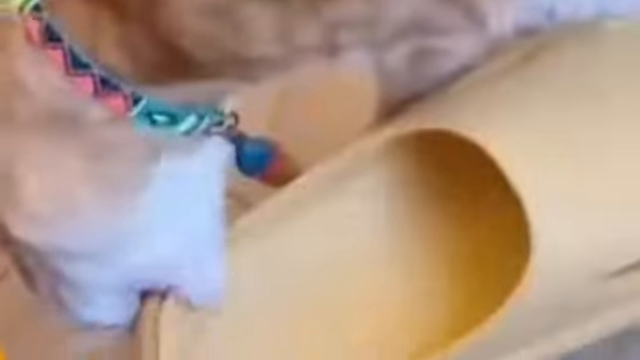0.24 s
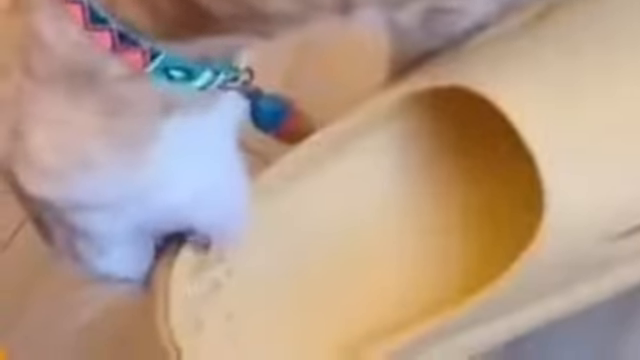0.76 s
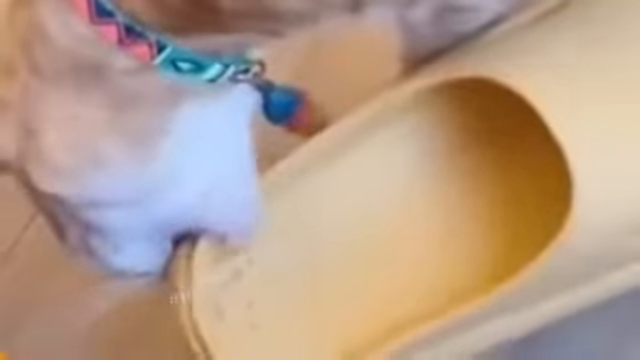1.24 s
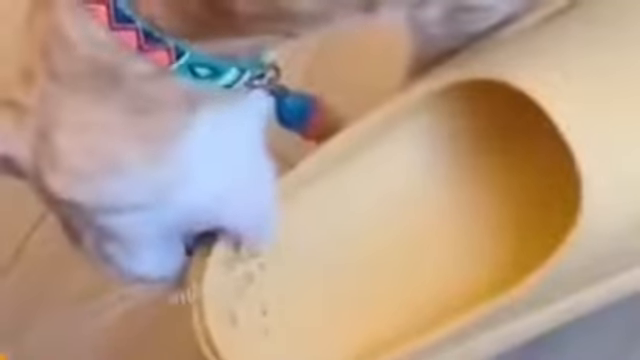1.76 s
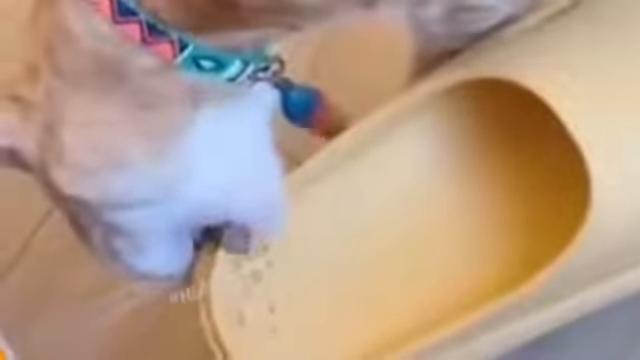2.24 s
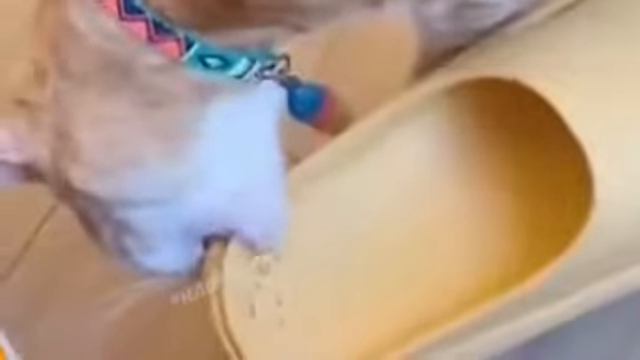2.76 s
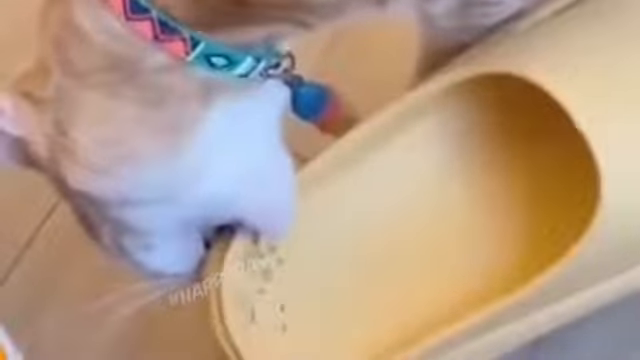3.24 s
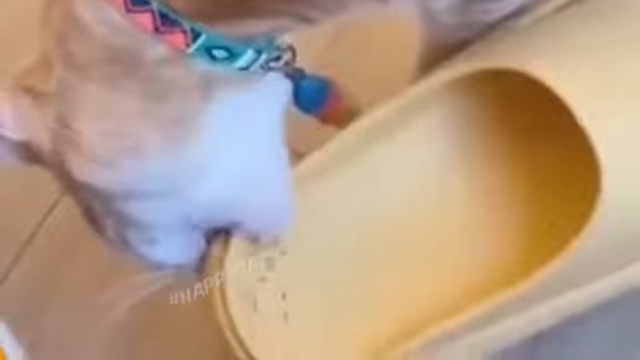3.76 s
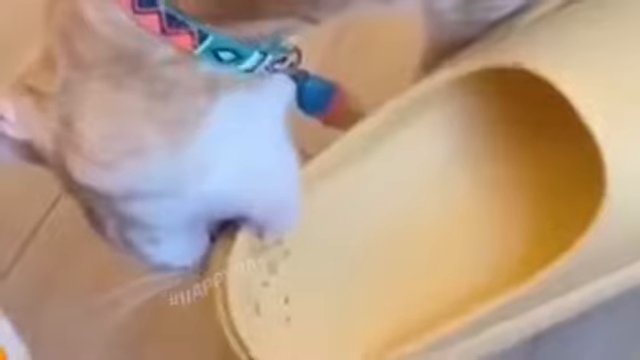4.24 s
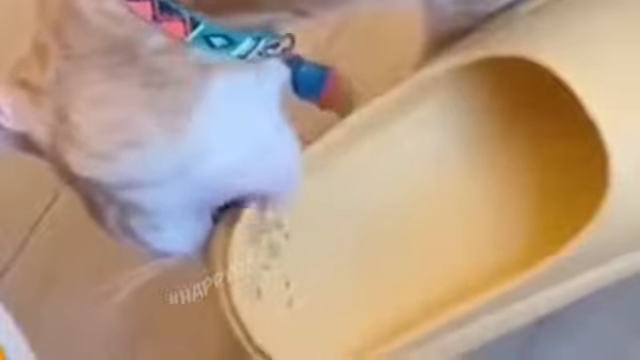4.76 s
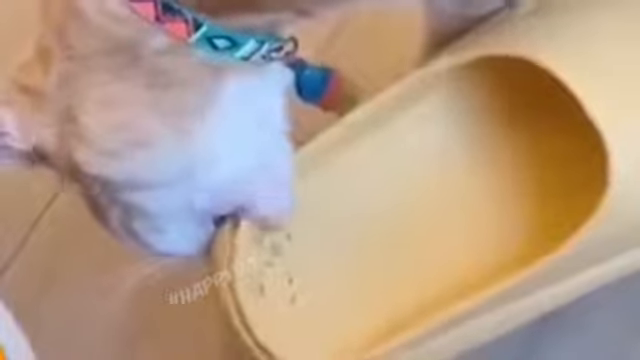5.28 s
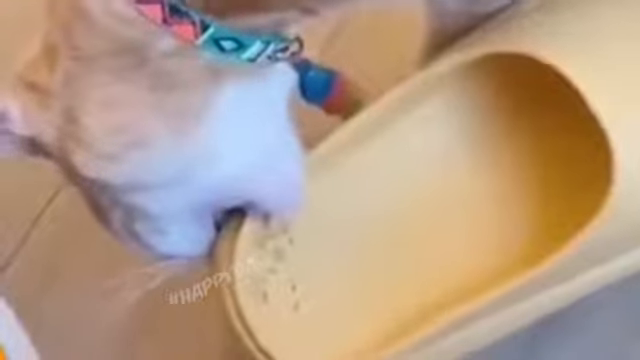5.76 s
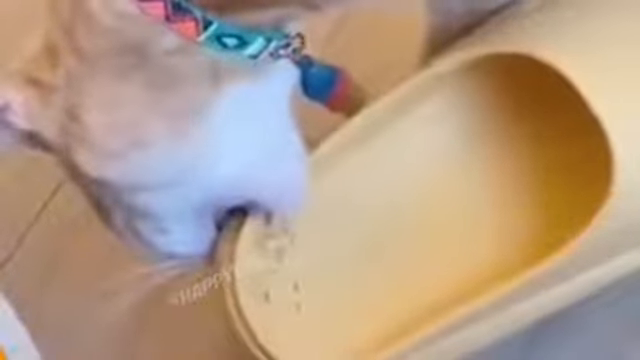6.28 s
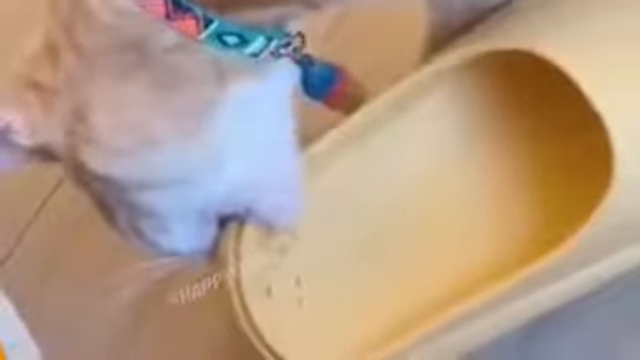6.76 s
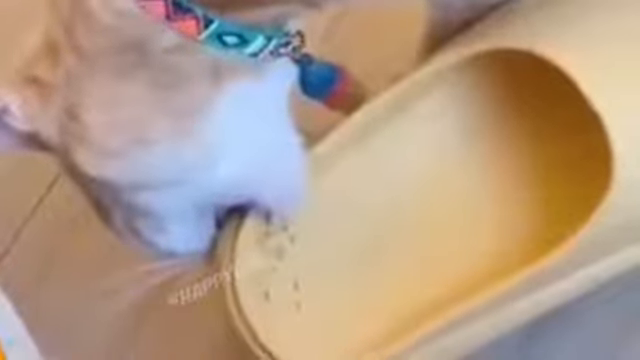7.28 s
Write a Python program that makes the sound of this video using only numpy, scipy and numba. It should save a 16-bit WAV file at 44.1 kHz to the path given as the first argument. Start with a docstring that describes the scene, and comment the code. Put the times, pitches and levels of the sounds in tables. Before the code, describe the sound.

Extremely close to the microphone, a cat eats dry food from a bowl. Every 1.3 seconds or so it draws hissing air through its nose, smacks and cracks a bit, then puffs out a snort whose tail flutters unevenly. A tiny collar bell tinkles faintly with some movements. Quiet indoor room with a low, swelling rumble and a few faint distant chirps.

```python
"""Cat chewing at the microphone

Right by the phone, a cat chews and snuffles: shaped noise hisses in through the nose, then puffs out in snorts
whose tails flutter with uneven beats. Bits crack and smack as noise pushes ring the mouth; teeth squeak in
falling tones. A tiny collar bell rings faintly in decaying sines, breathy chirps come from far off, and
bands of background noise lie under it all with a low, swelling room rumble.
"""
import sys
import numpy as np
from scipy import signal
from scipy.io import wavfile
from scipy.ndimage import uniform_filter1d
from numba import njit

SR = 44100
rng = np.random.default_rng(int(sys.argv[2]) if len(sys.argv) > 2 else 0)


def wav_out(sig):
    """Save sig, one row per channel (or a flat mono array), as 16-bit PCM at SR to the path in sys.argv[1]."""
    wavfile.write(sys.argv[1], SR, np.round(np.clip(np.atleast_2d(sig).T, -1, 1) * 32767).astype(np.int16))


N = 331191  # samples, about 7.5 s


def undb(db):
    """Gain of a level."""
    return 10 ** (np.asarray(db) / 20)


def unit(x):
    """Scale to rms 1."""
    return x / np.sqrt(np.mean(x ** 2))


@njit
def svf(x, hz, width):
    """State-variable band-pass whose centre and width may move, gain 1 at the centre."""
    y, band, low = np.empty(len(x)), 0., 0.
    for i in range(len(x)):
        g = np.tan(np.pi * hz[i] / SR)
        damping = width[i] / hz[i]
        v = (band + g * (x[i] - low)) / (1 + g * (g + damping))
        band = 2 * v - band
        low += 2 * g * v
        y[i] = damping * v
    return y


def ring(x, hz, width):
    """A steep resonance: the band-pass twice, each pass wider so that the pair has about the given width."""
    hz = np.zeros(len(x)) + hz
    width = np.zeros(len(x)) + 1.5 * width
    return svf(svf(x, hz, width), hz, width)


def body(x, modes):
    """Sum of resonances, neighbours in opposite phase."""
    return sum((-1) ** k * undb(db) * ring(x, hz, w) for k, (hz, w, db) in enumerate(modes))


def walk(rate):
    """Random levels held 1 / rate s and slewed twice."""
    k = int(SR / rate)
    steps = np.repeat(rng.standard_normal(N // k + 1), k)
    return uniform_filter1d(uniform_filter1d(steps, k), k)[:N]


def patchy(x, modes):
    """Sum of resonances that each brighten and dim alone as the mouth moves."""
    out = 0
    for k, (hz, width, db) in enumerate(modes):
        gain = undb(db + 3.2 * walk(50))  # 50 new levels per s
        out = out + (-1) ** k * gain * ring(x, hz, width)
    return out


def dull(x, cheek_hz=7700):
    """Flesh takes the top off what sounds inside the head: a low-pass."""
    return signal.sosfilt(signal.butter(4, cheek_hz, fs=SR, output="sos"), x)


SHUT_DB = -110


def swell(u, attack, curve=1.3):
    """Level in dB of a start: shut before 0, rising to 0 dB over the attack."""
    return np.maximum(20 * curve * np.log10(np.clip(u / attack, 1e-9, 1)), SHUT_DB)


# Spectrum of the room's background, before its overall level: pitch_hz, relative_db_per_hz
ROOM_SPECTRUM = [(12, -31), (20, -23.5), (119, -3), (386, -13.5), (954, -31), (1330, -23.5), (1560, -31.5),
                 (2110, -23), (2290, -31.5), (3760, -25.5), (4680, -32.5), (7660, -31.5), (8790, -31),
                 (9800, -58), (14000, -56)]
# Level of the low rumble over time: time_s, level_db
RUMBLE_LEVELS = [(0.0, -63), (0.29, -57.5), (1.09, -67), (1.13, -52.5), (2.32, -74), (2.46, -51.5),
                 (2.59, -57.5), (3.3, -64), (3.97, -56), (4.45, -66), (5.56, -46.5), (5.66, -59),
                 (5.8, -51), (5.91, -76), (6.08, -54), (6.23, -72.5), (6.43, -59.5), (7.5, -66)]


def room(room_db=-64, rumble_hz=70.5, rumble_width_hz=46, rumble_swell_db=1.5):
    """Third-octave bands of background noise that flicker alone, and a band of low noise that swells."""
    hiss = 0
    spectrum_hz, spectrum_db = np.transpose(ROOM_SPECTRUM)
    for hz in 25 * 2 ** (np.arange(27) / 3):
        db = np.interp(np.log(hz), np.log(spectrum_hz), spectrum_db) + 0.5 * walk(1.4)
        hiss = hiss + undb(db) * ring(rng.standard_normal(N), hz, hz / 4)
    time_s, level_db = np.transpose(RUMBLE_LEVELS)
    rumble = ring(rng.standard_normal(N), rumble_hz, rumble_width_hz)
    rumble = unit(undb(rumble_swell_db * walk(7)) * rumble)
    rumble_db = np.interp(np.arange(N) / SR, time_s, level_db)
    return undb(room_db) * unit(hiss) + undb(rumble_db) * rumble


# Modes of the tiny collar bell: pitch_hz
BELL_PITCHES = [7752, 8441, 11890, 12578]
# The same modes, against the jerk: relative_db, t60_s
BELL_MODES = [(9.5, 0.52), (10, 0.4), (-14, 0.5), (-20.5, 0.35)]
# Jerks of the collar: start_s, level_db, upper_modes_db (added to all but the lowest mode)
COLLAR_JERKS = [(.0, -65, -19), (.125, -53, -1), (1.146, -65, -5), (1.385, -92, -16), (2.68, -72.5, -9),
                (3.83, -68.5, 4), (5.271, -68, 5), (6.402, -59.5, -2), (6.662, -62.5, 4)]


def bell():
    """Each jerk rings the high modes of the tiny bell as decaying sines in random phase."""
    out, t = np.zeros(N + SR), np.arange(SR) / SR
    for s, db, upper_db in COLLAR_JERKS:
        for k, (hz, (mode_db, t60)) in enumerate(zip(BELL_PITCHES, BELL_MODES)):
            gain = undb(db + mode_db + upper_db * (k > 0) - 60 * t / t60)
            out[int(s * SR):][:SR] += gain * np.sin(2 * np.pi * (hz * t + rng.random()))
    return out[:N]


# Air drawn in while chewing, one curve per breath: time_s, nose_db, mouth_db, nose_pitch_hz
BREATHS_IN = [
    [(0.0, -60, -52.5, 1772), (0.06, -62, -63.5, 1720), (0.112, -64, -62, 1762)],
    [(0.84, -77, -70, 1915), (0.98, -59.5, -83.5, 1930), (1.095, -40.5, -49.5, 1691),
     (1.11, -51, -67, 1688), (1.174, -55, -45.5, 1503), (1.244, -47, -54.5, 1577), (1.314, -61, -65, 1603),
     (1.37, -88.5, -66, 1680)],
    [(2.145, -62, -66, 1780), (2.21, -69, -81, 1863), (2.225, -72, -64, 1880), (2.293, -57, -66, 1829),
     (2.36, -45, -58, 1832), (2.445, -60, -49.5, 1749), (2.46, -66, -46.5, 1546), (2.49, -63, -42.5, 1504),
     (2.604, -72.5, -59.5, 1530), (2.665, -65, -58, 1565)],
    [(3.36, -79, -77, 1900), (3.445, -59, -58.5, 1716), (3.53, -59, -64.5, 1700), (3.6, -67, -45.5, 1728),
     (3.66, -49, -46.5, 1620), (3.764, -62, -65.5, 1560), (3.812, -63.5, -66, 1773)],
    [(4.625, -64, -78, 1761), (4.744, -70.5, -74, 1787), (4.81, -65.5, -48.5, 1792),
     (4.894, -58.5, -47, 1839), (4.93, -43, -48, 1738), (5.0, -43, -47, 1630), (5.04, -44, -40.5, 1530),
     (5.088, -45, -49.5, 1609), (5.192, -59.5, -60, 1500), (5.25, -71, -59, 1844)],
    [(6.16, -79, -80.5, 2247), (6.2, -61.5, -80, 2030), (6.24, -61, -58.5, 1954), (6.29, -59, -66, 1930),
     (6.346, -51, -64, 1727), (6.4, -60, -47.5, 1660), (6.515, -64, -49, 1672), (6.547, -54, -66, 1605),
     (6.635, -54, -60, 1853)],
]


def drawn_in(t, throat_db=3.5, chest_db=-4):
    """Gains of nose, throat, hiss and chest, and the nose resonance, while air comes in."""
    time_s, *columns = np.transpose([row for part in BREATHS_IN for row in part])
    nose_db, mouth_db, hz = (np.interp(t, time_s, c) for c in columns)
    on = sum((t >= part[0][0]) & (t <= part[-1][0]) for part in BREATHS_IN)
    power = on * undb([nose_db, mouth_db + throat_db, mouth_db]) ** 2
    nose, throat, hiss = np.sqrt(power + gasps(t))
    return np.array([nose, throat, hiss, undb(chest_db) * hiss]), hz


# Snorts out of the nose, close up: start_s, attack_s, nose_db, mouth_db (against the nose),
# chest_db (against the nose), puff_s (time constant), puff_drop_db, fade_db_per_s, length_s,
# first_nose_hz, last_flap_per_s (the rate it slows towards)
SNORT_EVENTS = [(0.114, .016, -30, 3.5, -4.5, 0.044, 11, 45.5, .19, 2032, 112),
                (1.371, .014, -29, -1, -8.5, 0.15, 9.5, 70, .33, 1860, 92),
                (2.667, 0.022, -25, -3, -12, 0.024, 8, 84, .4, 1980, 80),
                (3.816, 0.015, -27.5, -1, -9, 0.09, 10.5, 65.5, .26, 2046, 108),
                (5.25, 0.022, -29.5, -2.4, -6.5, 0.16, 15, 35, .5, 2016, 66),
                (6.637, 0.025, -27.5, -2, -14, 0.071, 8, 59, 0.52, 2033, 73)]
# How many times as fast as the nose each layer fades: throat, hiss, chest
LAYER_FADE_PACE = [0.9, 1.295, 0.99]
# The slower the flap, the harder it beats: beats_per_s, level_db (against the air)
FLAP_LEVELS = [(60, 5), (95, 2.5), (120, -7), (150, -30)]
NOSE_IN_WIDTH_HZ, NOSE_OUT_WIDTH_HZ = 310, 470
NOSE_REST_HZ, NOSE_SETTLE_S = 2040, .08
FLAP_START_PER_S, FLAP_SLOW_S = 150, .15
CHEST_ATTACK_S, SNORT_THROAT_DB = 0.06, -3.5  # throat against the hiss
PUFF_HOLD_S, CLOSE_DB_PER_S = 0.015, 129.5


def snorts(t, gains, hz):
    """A puff, a fading tail, then the nose closes; the flap slows and beats harder against the air."""
    gains, hz = gains.copy(), hz.copy()
    width, rate, flap_gain = t * 0 + NOSE_IN_WIDTH_HZ, t * 0 + FLAP_START_PER_S, t * 0
    for s, attack, db, mouth_db, chest_db, puff_s, puff_db, fade, length, first_hz, last_rate in SNORT_EVENTS:
        u = t - s
        late = np.maximum(u - attack - PUFF_HOLD_S, 0)
        fall = puff_db * (1 - np.exp(-late / puff_s)) + fade * late
        fall = fall + CLOSE_DB_PER_S * np.maximum(u - length, 0)
        starts = [swell(u, attack)] * 3 + [swell(u, CHEST_ATTACK_S)]
        layers_db = [0, mouth_db + SNORT_THROAT_DB, mouth_db, chest_db]
        for k, (layer_db, pace, start) in enumerate(zip(layers_db, [1, *LAYER_FADE_PACE], starts)):
            gains[k] = np.hypot(gains[k], undb(db + layer_db + start - pace * fall))
        on = (u >= 0) & (db - fall > SHUT_DB)
        hz[on] = NOSE_REST_HZ + (first_hz - NOSE_REST_HZ) * np.exp(-u[on] / NOSE_SETTLE_S)
        width[on] = NOSE_OUT_WIDTH_HZ
        slowing = np.exp(-(u[on] / FLAP_SLOW_S) ** 2)
        rate[on] = last_rate + (FLAP_START_PER_S - last_rate) * slowing
        flap_gain[on] = undb(np.interp(rate[on], *np.transpose(FLAP_LEVELS)))
    return (*gains, hz, width, rate, flap_gain)


# Ring of the nose passage under each beat: pitch_hz, width_hz, relative_db
FLAP_MODES = [(1950, 800, 0), (2650, 750, -3), (7800, 1200, -24)]


def flap(rate, jitter=.2):
    """Sharp beats at uneven intervals ring the nose passage."""
    chance = rng.standard_normal((2000, 2))
    beat_turns = np.cumsum(np.exp(jitter * chance[:, 0]))
    at = np.searchsorted(np.cumsum(rate) / SR, beat_turns)
    beats = np.zeros(N + 1)
    beats[at] = undb(3 * chance[:, 1])
    # rarer beats are bigger, so the mean power stays the same
    return unit(body(dull(beats[:N] / np.sqrt(rate)), FLAP_MODES))


# Resonances of the head, close up; all four: pitch_hz, width_hz, relative_db
# air hissing through mouth and teeth
HISS_MODES = [(3280, 500, -25), (3870, 650, 3), (4420, 660, 4), (5466, 760, -1.5), (6283, 330, -1),
              (7170, 370, -7.5), (7940, 520, -8)]
# the bright top, not dulled by the cheek
SIZZLE_MODES = [(8900, 2600, -33.5), (11300, 690, -30), (13590, 2000, -41.5)]
# the throat
THROAT_MODES = [(2580, 1000, 9.5), (1390, 2100, -8.5)]
# the chest
CHEST_MODES = [(808, 47, 8.5), (560, 810, -3.5), (1000, 56, -1), (307, 410, -21)]


def breath(sizzle_slope=0.48):
    """Turbulent air sounds through nose, throat, teeth and chest; the flap beats along."""
    ms = np.arange(0, N / SR, .001)
    controls = (np.interp(np.arange(N) / SR, ms, c) for c in snorts(ms, *drawn_in(ms)))
    nose_gain, throat_gain, hiss_gain, chest_gain, hz, width, rate, flap_gain = controls
    air = rng.standard_normal(N) * undb(2.5 * walk(120) + 3 * walk(600))
    inner = dull(air)
    # the harder the flap beats, the less air passes between the beats
    air_share = 1 / np.hypot(1, flap_gain)
    nose = (unit(ring(inner, hz, width)) + flap_gain * flap(rate)) * air_share
    throat = unit(patchy(inner, THROAT_MODES)) * air_share
    # faster air at the nostrils is brighter
    sizzle = (hiss_gain * undb(33)) ** sizzle_slope * body(air, SIZZLE_MODES)
    hiss = patchy(inner, HISS_MODES)
    hiss = (hiss + sizzle) / hiss.std()
    chest = unit(patchy(inner, CHEST_MODES))
    return nose_gain * nose + throat_gain * throat + hiss_gain * hiss + chest_gain * chest


# Short gasps and scrapes on top of the breath: start_s, hold_s, nose_db, throat_db, hiss_db
GASP_EVENTS = [(0.806, 0.017, -69, -55.5, -67), (2.11, 0.013, -66, -51, -62.5),
               (3.319, .025, -77, -67.5, -86), (3.387, 0.049, -74, -48, -55), (3.531, 0.026, -36, -45, -45),
               (4.578, 0.032, -59.5, -61.5, -63.5), (4.749, 0.085, -41.5, -52.5, -46),
               (6.135, 0.011, -70, -77, -84.5), (6.202, 0.015, -52, -51, -67.5)]


def gasps(t, attack_s=0.0071, fall_db_per_s=900.5):
    """Power each gasp adds to nose, throat and hiss: a quick rise, a hold and a steep fall."""
    power = 0
    for s, hold, *db in GASP_EVENTS:
        shape = swell(t - s, attack_s) - fall_db_per_s * np.maximum(t - s - attack_s - hold, 0)
        power = power + undb(shape + np.array(db)[:, None]) ** 2
    return power


def add(out, s, push, db, hz, width_hz, bright_db, dull_db, leak_db):
    """Let a push ring mouth, teeth and chest, and lay it in at time s; a little top leaks past the lips."""
    inner = dull(push)
    mouth = ring(inner, hz, width_hz)
    teeth = body(inner, HISS_MODES) + undb(leak_db) * body(push, SIZZLE_MODES)
    chest = body(inner, CHEST_MODES[1:])
    layers = zip((0, bright_db, dull_db), (mouth, teeth, chest))
    sound = sum(undb(g) * part / np.abs(part).max() for g, part in layers)
    out[int(s * SR):][:len(push)] += undb(db) * sound


# Soft wet smacks of tongue and lips, close up: start_s, level_db (mouth peak before a common 6 dB cut),
# mouth_hz, bright_db (teeth against mouth), dull_db (chest against mouth), t60_s
SMACK_EVENTS = [(0.8908, -34.5, 1900, -16, -42, 0.014), (1.0995, -8, 1600, -10.5, -17, 0.046),
                (1.1084, -18, 1680, -5, -5, 0.081), (1.1273, -15, 1524, -2, -10, 0.094),
                (2.1199, -45, 1760, -17, -16, 0.034), (2.2192, -32.5, 2630, 2.5, -5, 0.0089),
                (2.3276, -50, 1730, -26, -29, 0.024), (2.383, -18.5, 1800, -8, -14.5, 0.035),
                (2.392, -17, 1720, -8, -16, 0.058), (2.411, -27, 1750, -8.5, -4.5, 0.039),
                (2.428, -27.5, 1590, -1, -3.5, 0.027), (2.446, -15, 1530, -8, -33, 0.075),
                (2.456, -27.5, 1470, -5, -30.5, 0.014), (3.8387, -8, 2100, -18, -37, 0.084),
                (4.657, -33, 1810, -17, -20, 0.011), (5.026, -19.5, 1340, 0.5, -6, 0.1),
                (5.045, -41, 2540, -19, -24, 0.022), (5.2744, -30, 2040, -10, -15, 0.05),
                (6.154, -40.5, 2250, -34, -35, 0.015), (6.2146, -32.5, 2400, -3.5, -6, 0.019),
                (6.2588, -36, 1900, -23, -12, 0.026), (6.3541, -28.5, 1680, -9.5, -11, 0.025),
                (6.365, -31, 1760, -1, -6, 0.019), (6.394, -26.5, 1730, -0.5, -29, 0.026),
                (6.4102, -24.5, 1680, 0.5, -15, 0.13), (6.438, -20, 1680, -10, -16, 0.035),
                (6.6575, -40, 2040, -7, -15, 0.031)]


def smacks(size=4096, rise_s=.003):
    """A short swell of noise that the mouth cavity turns into a pitched blip."""
    out, t = np.zeros(N), np.arange(size) / SR
    for s, db, hz, bright_db, dull_db, t60 in SMACK_EVENTS:
        push = rng.standard_normal(size) * undb(-60 * t / t60) * (1 - np.exp(-t / rise_s))
        add(out, s, push, db - 6.0, hz, 250., bright_db, dull_db, leak_db=0.5)
    return out


# Hard bits snapping between the teeth, close up, and from 4.955 to 4.998 s a quick flutter of the nose flap #
# as air comes in, played the same way: start_s, peak_db (mouth), mouth_hz, # bright_db (teeth against mouth),
# dull_db (chest against mouth), t60_s, # leak_db (gain of the top past the lips), hum_db (against the peak)
SNAP_EVENTS = [(1.1388, -17, 1400, -3.5, -46, 0.045, -15.5, -28.5),
               (1.2177, -29.5, 2570, 0, -38, 0.024, 5, -47),
               (2.2168, -29.5, 2440, -14, -35, 0.024, -5, -40.5),
               (2.4525, -9, 1520, -3, -17, 0.015, -9.5, -31.5),
               (2.5077, -27, 1630, 2.5, -16.5, 0.021, 5.5, -17),
               (3.537, -30.5, 1670, -2.5, -5.5, 0.0089, 0.5, -34),
               (3.597, -16, 1780, -8, -16, 0.061, 2.5, -32), (3.673, -24.5, 2950, 2, -21, 0.024, -3, -26),
               (3.866, -35, 2010, -24.5, -22.5, .01, 7.8, -30.5),
               (4.803, -1, 2310, -6, -11, 0.0068, 9, -41.5), (4.955, -26, 1860, -5, -40, .008, 9, -32),
               (4.971, -36, 1930, -13, 2, 0.0065, -7, -30), (4.998, -29, 1940, -4.5, -20, 0.0055, 7, -30),
               (5.036, -11.5, 2350, -2, -9, 0.0076, 3, -32),
               (5.0903, -30.5, 2450, 0.5, -9.5, .012, -2.2, -36),
               (6.4319, -18, 1740, -4.5, -11, 0.026, 3, -37),
               (6.478, -20.5, 2440, -3.5, -30, 0.097, 4, -31),
               (6.4943, -18.5, 2320, -5.5, -26, 0.0098, 12, -34)]


def snaps(size=12288, blow=7.3, crumble_t60_s=0.4, crumble_db=-17, crumble_per_db=0.51):
    """One sharp blow, a spray of splinters and a tail of crumbs; the closing mouth hums along."""
    out, t = np.zeros(N), np.arange(size) / SR
    fade = undb(-60 * t / crumble_t60_s)
    for s, db, hz, bright_db, dull_db, t60, leak_db, hum_db in SNAP_EVENTS:
        noise = rng.standard_normal(size)
        # harder snaps leave fewer crumbs for their size
        crumbs = undb(crumble_db - crumble_per_db * (db + 15.5)) * fade
        push = noise * (undb(-60 * t / t60) + crumbs)
        push[0] = blow
        add(out, s, push, db, hz, 1200., bright_db, dull_db, leak_db)
        hum = unit(ring(noise, 1510, 180))  # the closed wet mouth, Hz and width in Hz
        out[int(s * SR):][:size] += undb(db + hum_db) * fade * hum
    return out


# Faint chirps from far off: start_s, length_s (time to fade 24 dB), pitch_hz, level_db (before swell and fade)
FAR_CHIRPS = [(1.885, 0.047, 3000, -59), (2.002, 0.16, 3860, -63.5), (7.272, 0.064, 3020, -66),
              (7.306, 0.073, 3840, -53.5)]


def chirps(width_hz=55.0, breathy=0.32, rise_s=0.022, linger=2.7):
    """Short whistles, a sine with a band of noise around it, that swell and linger."""
    out = np.zeros(N)
    for s, length, hz, db in FAR_CHIRPS:
        t = np.arange(int(linger * length * SR)) / SR
        shape = undb(db + swell(t, rise_s) - 24 * t / length)
        breathing = unit(ring(rng.standard_normal(len(t)), hz, width_hz))
        whistle = shape * unit(np.sin(2 * np.pi * hz * t) + breathy * breathing)
        add_at = out[int(s * SR):][:len(t)]
        add_at += whistle[:len(add_at)]
    return out


# Teeth slipping on a hard face, close up: start_s, length_s, start_hz, end_hz, level_db,
# overtone_db (step from each partial to the next), loudest_share (of the length)
TOOTH_SQUEAKS = [(2.217, .045, 1300, 620, -52, -6, .6), (3.388, .045, 1800, 720, -45, -1.2, .6),
                 (4.747, .03, 2300, 1700, -38, -14, .55), (4.75, .05, 1500, 650, -48, -10, .5)]


def squeaks(grit=.55, count=5):
    """Gritty stick-slip tones that fall fast and then level off as the jaw slows."""
    out = np.zeros(N)
    for s, length, start_hz, end_hz, db, overtone_db, loudest in TOOTH_SQUEAKS:
        u = np.arange(int(length * SR)) / (length * SR)
        phase = 2 * np.pi * np.cumsum(end_hz + (start_hz - end_hz) * (1 - u) ** 2) / SR
        tone = 0
        for k in range(count):
            rough = 1 + grit * walk(500)[:len(u)]
            tone = tone + undb(overtone_db * k) * rough * np.sin((k + 1) * phase)
        shape = np.sin(np.pi * u ** (np.log(.5) / np.log(loudest)))
        out[int(s * SR):][:len(u)] += undb(db) * shape * tone
    return out


def scene():
    """Everything at one microphone."""
    return (room() + bell() + breath() + smacks() + snaps() + chirps() + squeaks())[None]


def record(dry, ceiling=1.1, top_hz=15100):
    """The phone rounds the loudest peaks and cuts the top."""
    rounded = ceiling * np.tanh(dry / ceiling)
    return signal.sosfilt(signal.ellip(8, .2, 70, top_hz, fs=SR, output="sos"), rounded)


dry = scene()
out = record(dry)
wav_out(out)
```